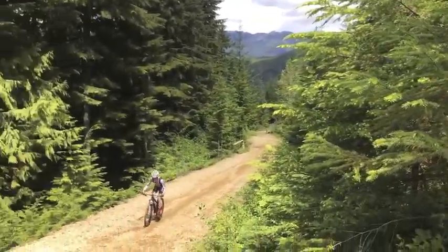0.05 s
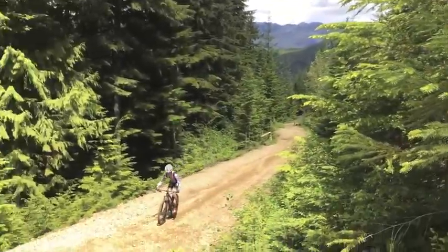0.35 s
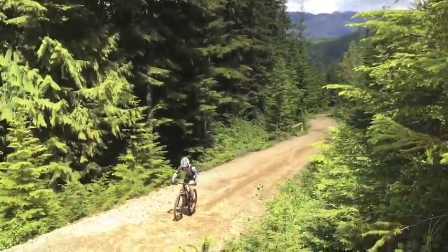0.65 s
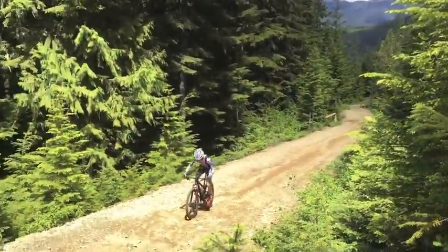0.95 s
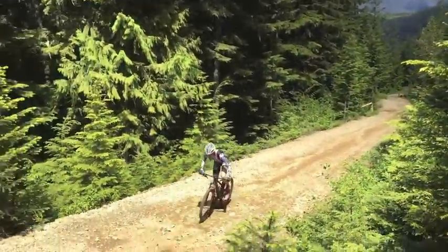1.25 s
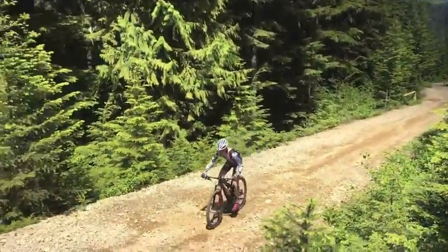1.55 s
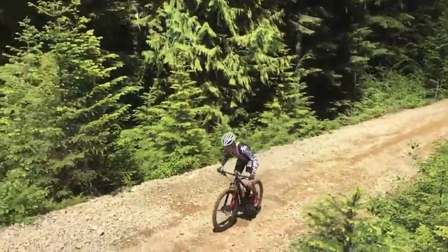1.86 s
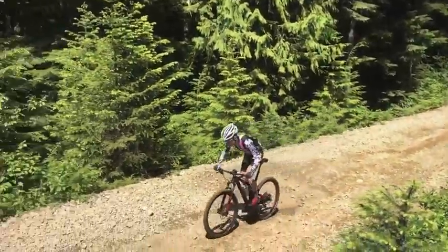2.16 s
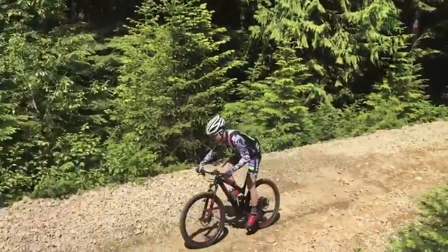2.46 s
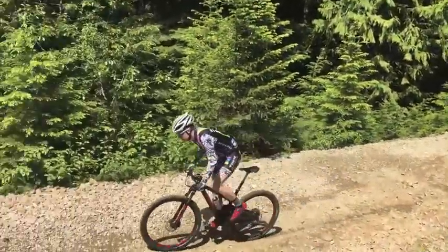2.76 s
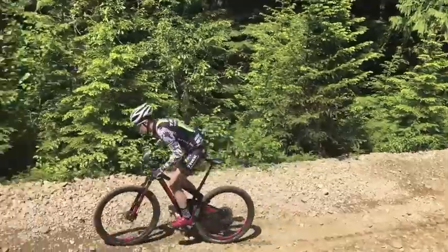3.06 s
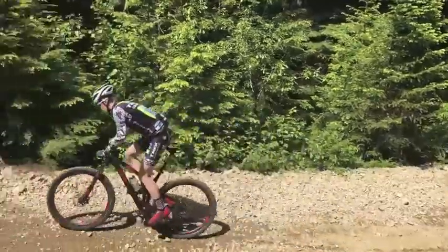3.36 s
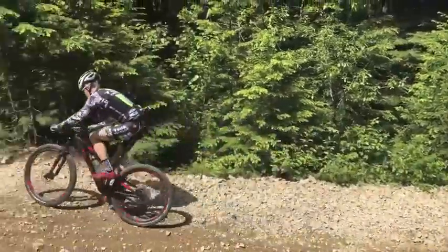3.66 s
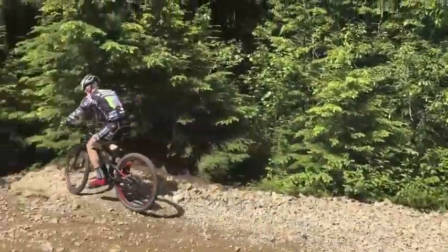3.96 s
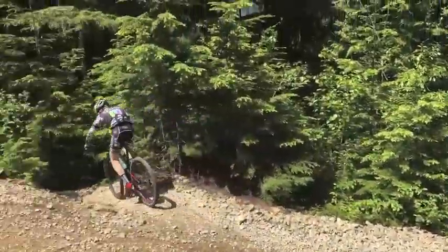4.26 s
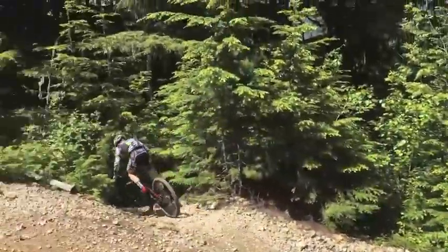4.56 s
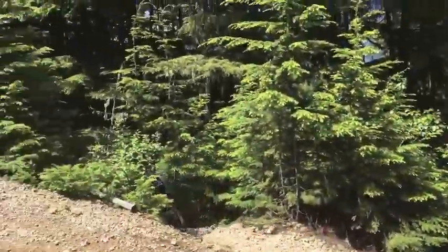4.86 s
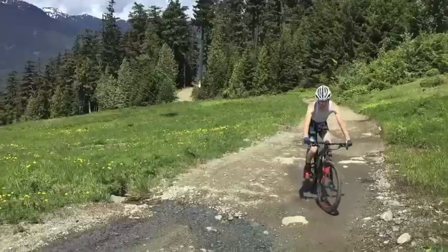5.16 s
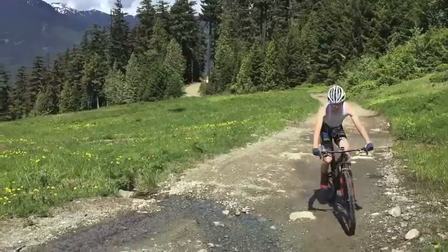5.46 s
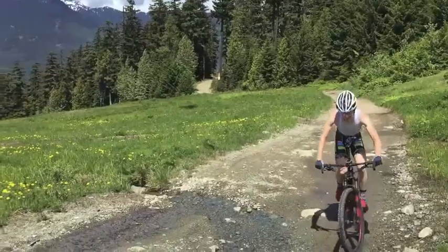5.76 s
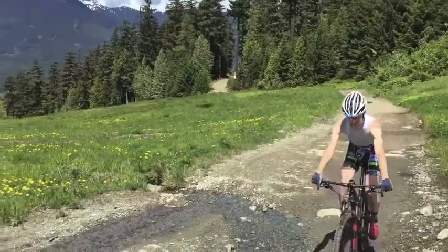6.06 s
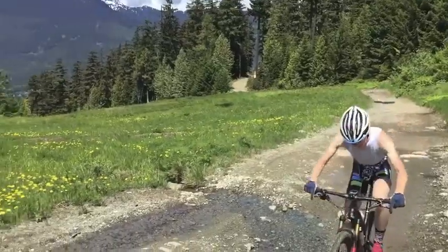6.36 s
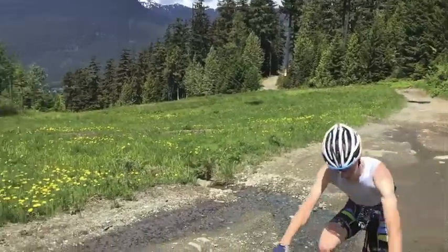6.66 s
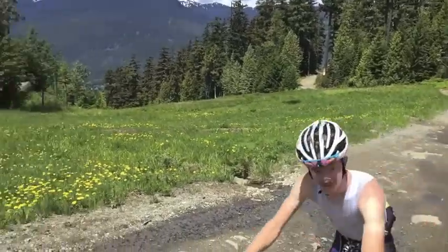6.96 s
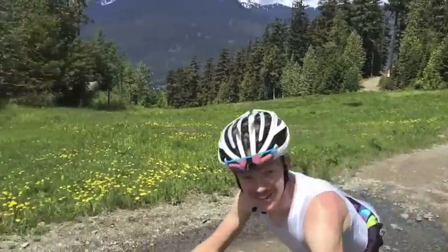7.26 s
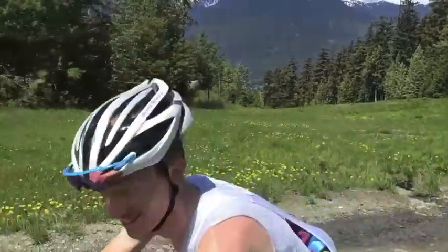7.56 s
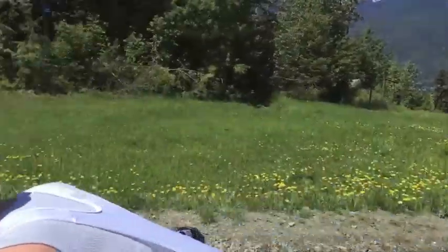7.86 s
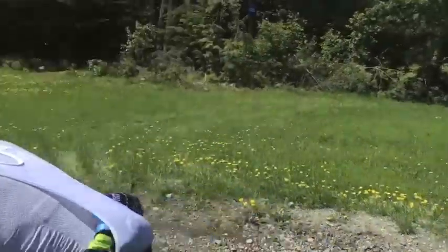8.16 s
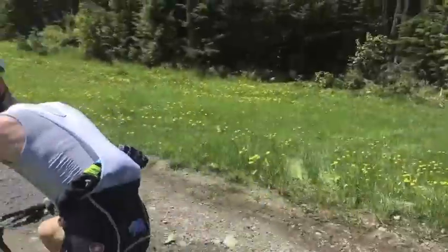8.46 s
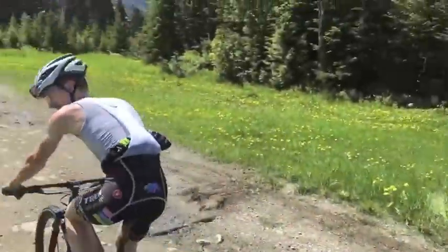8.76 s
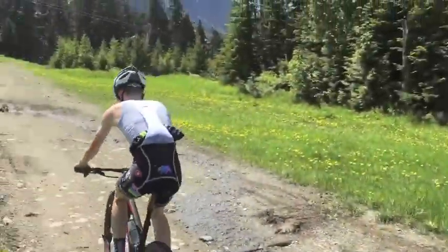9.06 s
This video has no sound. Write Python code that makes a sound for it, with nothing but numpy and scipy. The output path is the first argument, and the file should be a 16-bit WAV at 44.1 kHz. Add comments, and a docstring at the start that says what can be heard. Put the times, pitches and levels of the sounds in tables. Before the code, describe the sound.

A mountain bike approaches on a gravel forest road, its tyres crunching softly, then louder as it passes, popping stones aside and thumping into loose heaps while the chain faintly jingles. After a brief dip, a second ride passes close to the microphone with a brighter, grittier crunch and a short skid. A faint bird calls far off, and low wind buffets the microphone, hardest at the end.

```python
"""Tyres crunch on gravel: a mountain bike rolls down a forest road and past, then a second ride passes
close by on a meadow track. The tyres grind countless small stones, pop larger ones aside, thump into
loose heaps and slide briefly; the chain jingles. A small bird calls far off in the hush of the forest,
and swirls of wind buffet the microphone, hardest at the end."""
import sys
import numpy as np
from scipy import signal
from scipy.fft import rfft, irfft
from scipy.io import wavfile
from scipy.ndimage import uniform_filter1d

SR = 44100
rng = np.random.default_rng(int(sys.argv[2]) if len(sys.argv) > 2 else 0)


def wav_record(signal):
    """Record a signal, one row per channel, as 16-bit PCM in the file named by sys.argv[1]."""
    frames = np.transpose(np.atleast_2d(signal))
    bounded = np.clip(frames, -1, 1)
    # unit amplitude maps onto the largest positive 16-bit level
    quanta = np.round(bounded * 32767).astype(np.int16)
    wavfile.write(sys.argv[1], SR, quanta)


N = 406769
TIME = np.arange(N) / SR
BEND_S, BANK_S = 2.25, 3.45  # the first rider enters the bend, then climbs the bank
CHANGE_S = 5.058  # the first ride gives way to the second
PASS_S, AWAY_S = 6.551, 7.61  # the second rider reaches the loose gravel, then leaves it


def undb(db):
    """Turn decibels into a factor to multiply by."""
    return np.exp(np.asarray(db) * np.log(10) / 20)


def unit(x):
    """Scale to an average level (rms) of 1."""
    return x / np.sqrt(np.mean(x ** 2))


def peak(x):
    """Scale to a peak of 1."""
    return x / np.abs(x).max()


def burst(x, size=176):
    """Scale a short sound so that its loudest few milliseconds have rms 1."""
    return x / np.sqrt(uniform_filter1d(x ** 2, size).max())


def add(out, start_s, x):
    """Mix a short sound into a longer one."""
    i = max(int(start_s * SR), 0)
    out[i:i + len(x)] += x[:len(out) - i]


def curves(table):
    """Join rows that begin with a time into one curve for each other column."""
    times, *columns = np.transpose(table)
    return [np.interp(TIME, times, column) for column in columns]


def walk(turns_per_s):
    """Random wandering with a spread near 1."""
    points = rng.standard_normal(4096)
    return np.interp(TIME * turns_per_s, np.arange(len(points)), points)


def clicks(per_s, spread_db):
    """Clicks at random moments, many weak and a few strong."""
    out = np.zeros(N)
    place, strength, side = rng.random((int(per_s * N / SR), 3)).T
    level_db = -spread_db * np.log(strength + np.exp(-4))
    out[(place * N).astype(int)] = np.sign(side - .5) * undb(level_db)
    return out


def keep(x, side, hz, order):
    """Keep the "low" or the "high" side of a frequency, or the "band" between two."""
    return signal.sosfilt(signal.butter(order, hz, side, fs=SR, output="sos"), x)


def band(x, low_hz, high_hz, order=2):
    """Keep what lies between two frequencies; a higher order cuts more steeply."""
    return keep(x + 1e-18, "band", [low_hz, min(high_hz, .47 * SR)], order)


def ring(x, hz, q):
    """Make a sound ring at one pitch; a higher q rings longer."""
    return signal.lfilter(*signal.iirpeak(min(hz, .42 * SR), max(q, 1), fs=SR), x + 1e-18)


def colour(x, tone, size=4096):
    """Shape the bass and treble along rows of pitch_hz, level_db."""
    hz, db = np.transpose(tone)
    bins_hz = np.maximum(np.fft.rfftfreq(size, 1 / SR), 1)
    gain = undb(np.interp(np.log(bins_hz), np.log(hz), db))
    # build the filter so that it never rings ahead of a click
    cepstrum = irfft(np.log(gain))
    cepstrum[1:size // 2] *= 2
    cepstrum[size // 2 + 1:] = 0
    response = irfft(np.exp(rfft(cepstrum)))
    return signal.oaconvolve(x, response)[:len(x)]


def air(level_db=-63):
    """The forest air makes a steady hush."""
    # tone of the hush: pitch_hz, level_db
    air_tone = [(180, -24.5), (300, -7.5), (430, -16), (587, 6), (913, -5.5), (1620, -12.5), (2300, -41.5),
                (4500, -27), (9000, -28), (15000, -35)]
    return undb(level_db) * unit(colour(rng.standard_normal(N), air_tone))


def bird(gain_db=-9.5, waver=0.017, flutter_db=3, echo_db=-2, echo_s=.18):
    """A far bird sings thin, wavering whistles, smeared by the trees between."""
    # whistles: start_s, length_s, start_hz, end_hz, level_db (before gain_db)
    notes = [(0.259, .038, 5450, 5230, -63), (0.322, 0.03, 5440, 5280, -65), (5.28, 0.029, 3450, 3070, -52),
             (5.328, .055, 3150, 3050, -54.5)]
    song = np.zeros(N)
    for start_s, length_s, start_hz, end_hz, level_db in notes:
        progress = np.linspace(0, 1, int(length_s * SR))
        hz = start_hz + (end_hz - start_hz) * progress ** 2
        hz *= 1 + waver * walk(310)[:len(hz)]
        whistle = np.sin(2 * np.pi * np.cumsum(hz) / SR)
        add(song, start_s, undb(level_db) * np.sin(np.pi * progress) * whistle)
    song *= undb(flutter_db * walk(150))
    t = TIME[:SR // 2]
    scatter = rng.standard_normal(len(t)) * undb(-60 * t / echo_s)
    echo = signal.oaconvolve(song, scatter / np.linalg.norm(scatter))[:N]
    return undb(gain_db) * (song + undb(echo_db) * echo)


def wind_swirls(gain_db=6.5, lead_s=0.0012, wake_s=0.024, churn_s=0.0086):
    """Each swirl of wind is one swing of pressure at the microphone, with a churning wake."""
    # swirls: time_s, peak_db (before gain_db), pitch_hz
    swirls = [(0.186, -34.5, 187), (1.737, -41, 135), (5.2, -37.5, 139), (7.236, -39.5, 115),
              (7.746, -37, 107), (7.859, -23.5, 128), (7.896, -26, 148), (7.928, -32, 148),
              (7.966, -32, 137), (8.16, -31, 140), (8.181, -32, 168), (8.2, -32, 158), (8.282, -32, 124),
              (8.31, -38, 126), (8.413, -36.5, 124), (8.439, -40.5, 193), (8.942, -24.5, 142),
              (8.98, -29, 154), (9.022, -36, 128), (9.088, -30, 117), (9.213, -32.5, 111)]
    out, t = np.zeros(N), TIME[:8192] - TIME[1024]
    for time_s, peak_db, hz in swirls:
        spread = (np.pi * hz * t) ** 2
        swing = (1 - 2 * spread) * np.exp(-spread)
        slow, fast = rng.standard_normal((2, len(t))) * (t > 0)
        wake = burst(band(slow * np.exp(-np.abs(t) / wake_s), 27, 118, order=3))
        churn = burst(band(fast * np.exp(-np.abs(t) / churn_s), 150, 410))
        buffet = swing + undb(-13) * wake + undb(-28) * churn
        add(out, time_s + t[0] - lead_s, undb(peak_db + gain_db) * buffet)
    # the microphone's opening leaks the slowest pressure, so each swing overshoots
    return keep(out, "high", 45, order=3)


def breeze(gain_db=2.5, flutter_db=4.0, swell_db=1.5):
    """The breeze makes a low, fluttering rumble."""
    # strength of the breeze: time_s, level_db (before gain_db)
    strength = [(0, -59.5), (1.2, -58.5), (1.7, -57.5), (2.2, -60), (2.7, -57.5), (4.1, -59), (4.9, -56),
                (5.3, -62), (6.1, -57), (7.5, -55.5), (9.22, -53.5)]
    # tone of the rumble: pitch_hz, level_db
    rumble_tone = [(20, -51), (35, -14), (55, 0), (100, -2.5), (170, -4), (260, -11.5), (400, -26.5),
                   (900, -51.5)]
    gusts = rng.standard_normal(N) * undb(flutter_db * walk(22) + swell_db * walk(3.7))
    return unit(colour(gusts, rumble_tone)) * undb(curves(strength)[0] + gain_db)


def tree_echo(x, echo_db=-21, echo_s=0.096):
    """Trunks and the bank add a faint, dull echo."""
    t = TIME[:SR // 2]
    scatter = band(rng.standard_normal(len(t)), 250, 3700, order=1)
    scatter *= undb(-60 * t / echo_s) * (t > .006)
    return x + undb(echo_db) * signal.oaconvolve(x, scatter / np.linalg.norm(scatter))[:N]


def road_echo(x, delay_s=0.002182, echo_db=-11, drift_octaves=0.36):
    """The road reflects the crunch a moment late; the delay drifts as the bike moves, shifting the tone."""
    late_s = delay_s * 2 ** (drift_octaves * walk(2))
    echo = undb(echo_db) * np.interp(TIME - late_s, TIME, x)
    return (x + echo) / np.hypot(1, undb(echo_db))


def chain():
    """On rough ground the links tick against the cogs and ring the thin steel."""
    # bouts of jingling: start_s, length_s, level_db
    rattles = [(3.284, 0.075, -65), (3.763, 0.33, -74), (4.39, 0.17, -70), (4.535, 0.13, -59),
               (4.842, 0.2, -69), (8.595, 0.43, -74.5)]
    # ringing notes of the chain and cogs: pitch_hz, level_db
    steel_notes = [(5600, -1), (6150, 7), (7000, 8), (9600, 8), (9950, 4), (13000, 0)]
    ticks = clicks(per_s=330, spread_db=4)
    steel = unit(sum(undb(db) * unit(ring(ticks, hz, q=27)) for hz, db in steel_notes))
    shake = np.zeros(N)
    for start_s, length_s, level_db in rattles:
        add(shake, start_s, undb(level_db) * signal.windows.tukey(int(length_s * SR), .5))
    return steel * shake


def tread(start_s=6.565, length_s=.21, knob_hz=266, level_db=-43, wobble=0.0588, flutter_db=4):
    """The knobs of a hard-pressed tyre drum on the ground in a short growl."""
    load = np.zeros(N)
    add(load, start_s, undb(level_db) * signal.windows.tukey(int(length_s * SR), .5))
    load *= undb(flutter_db * walk(40))
    hz = knob_hz * (1 + wobble * walk(50))
    return load * np.sin(2 * np.pi * np.cumsum(hz) / SR)


def slide(width_hz=230, spray_db=-10):
    """A tyre slides sideways: its knobs scrape in a rising rasp that ends in a spray of grit."""
    # the scrape: time_s, level_db, pitch_hz
    scrape = [(7.38, -47, 1537), (7.44, -38, 1675), (7.49, -39.5, 1707), (7.55, -33.5, 2000),
              (7.59, -43, 2040), (7.62, -80, 2000)]
    level_db, hz = curves(scrape)
    slips = clicks(per_s=2100, spread_db=3.0) * np.exp(2j * np.pi * rng.random(N))
    roughness = keep(slips, "low", width_hz, order=2)
    # move the roughness up to the pitch of the scrape
    rasp = unit(np.real(roughness * np.exp(2j * np.pi * np.cumsum(hz) / SR)))
    progress = (TIME - scrape[0][0]) / (scrape[-1][0] - scrape[0][0])
    grit = clicks(per_s=3000, spread_db=2)
    spray = unit(band(grit, 4200, 9100, order=3)) * 2 * progress ** 2
    return (rasp + undb(spray_db) * spray) * undb(level_db) * (progress > 0) * (progress < 1)


def chips(rise_s=0.00033):
    """A hard chip of stone chatters against another and rings with a few short notes."""
    # clinks: start_s, peak_db, pitch_hz, contact_s
    clinks = [(0.4345, -48, 3900, .0014), (1.1305, -35.5, 2310, 0.0025), (1.193, -46, 2560, 0.0035),
              (1.492, -50.5, 7200, 0.0039), (1.988, -43, 4300, 0.0015), (3.309, -35, 6900, 0.0032),
              (5.457, -52, 3900, 0.0032), (5.78, -38, 3670, 0.0021), (5.857, -46, 3740, 0.0018),
              (5.935, -39, 3600, .0022), (6.16, -42, 4590, 0.0022), (6.903, -33, 4200, 0.0046),
              (6.962, -34.5, 6200, 0.0039), (7.056, -32.5, 5230, 0.0017), (7.3426, -25, 4080, 0.003),
              (8.642, -36, 3850, 0.0014)]
    # ringing notes of a chip: pitch_ratio, level_db
    chip_notes = [(1, 0.5), (1.65, -6), (3.7, -7.5)]
    out, t = np.zeros(N), TIME[:2048]
    for start_s, peak_db, hz, contact_s in clinks:
        contact = rng.standard_normal(len(t)) * (1 - np.exp(-t / rise_s)) * np.exp(-t / contact_s)
        clink = 0
        for ratio, level_db in chip_notes:
            note = ring(ring(contact, hz * ratio, q=6), hz * ratio, q=2)
            clink += undb(level_db) * peak(note)
        add(out, start_s, undb(peak_db) * peak(band(clink, 1400, 12000)))
    return out


def slams(spill_db=-20, spill_s=0.012):
    """A tyre crushes a heap of stones: a crunch, a hard clack, a spit of grit and a rubbery thud."""
    # hits: start_s, level_db, pitch_hz, grit_db (more gives more spit and clack), rise_s, decay_s
    hits = [(1.541, -39.5, 1460, -33, 0.00051, 0.011), (2.643, -38, 1630, -57, 0.00068, 0.0056),
            (3.073, -38.5, 1840, -33, 0.0009, 0.0062), (3.594, -34.5, 1630, -31, 0.0055, 0.015),
            (3.794, -34.5, 1340, -24.5, 0.0015, 0.0067), (4.083, -18.5, 1590, -19, 0.00087, 0.0037),
            (4.426, -38, 1180, -63, 0.0034, 0.01), (4.559, -28, 1500, -16, 0.0017, 0.0054),
            (4.733, -33.5, 1160, -74, 0.0044, 0.0066), (6.551, -23.5, 1500, -6, 0.0014, 0.0085),
            (6.583, -27, 2010, -35, 0.00069, 0.0039), (9.009, -38.5, 1040, -31, 0.0031, 0.0044),
            (9.155, -41, 1200, -27, 0.00096, 0.008)]
    out, t = np.zeros(N), TIME[:8192]
    for start_s, level_db, hz, grit_db, rise_s, decay_s in hits:
        # the heap gives way, then a few stones spill after
        spill = undb(spill_db) * np.exp(-t / spill_s)
        force = (1 - np.exp(-t / rise_s)) ** 2 * (np.exp(-t / decay_s) + spill)
        coarse, medium, fine, rubber = force * rng.standard_normal((4, len(t)))
        crunch = burst(band(ring(coarse, hz, q=1.46), 520, 1740))
        clack = undb(grit_db / 2 - 2) * burst(band(ring(medium, 2800, q=2.6), 1250, 5100))
        spit = undb(grit_db - 3) * burst(band(ring(fine, 6600, q=3.7), 3400, 16600))
        thud = undb(-14) * burst(band(rubber, 143, 740))
        add(out, start_s, undb(level_db) * burst(crunch + clack + spit + thud))
    return out


def rolling_db():
    """Plain rolling grows and fades as each rider nears and leaves."""
    # base level of each ride's crunch: time_s, level_db
    first_ride = [(0, -57), (.7, -58), (1.4, -56.5), (2.25, -57), (2.65, -51.5), (3.2, -46.5),
                  (3.98, -46.5), (4.33, -53.5), (4.8, -50.5), (5.05, -62)]
    second_ride = [(5.06, -56.5), (5.75, -53), (6.1, -44.5), (6.5, -50.5), (6.8, -40.5), (7.12, -42.5),
                   (7.23, -48), (7.45, -42), (7.65, -48), (7.88, -44.5), (8.05, -48.5), (8.8, -49),
                   (9.0, -56), (9.22, -50.5)]
    return np.where(TIME < CHANGE_S, curves(first_ride)[0], curves(second_ride)[0])


def stray_pops(per_s=2.8, above_db=8, spread_db=5, pitch_hz=1500, spread_octaves=0.22, snap_db=-18):
    """List random pops of lesser stones; they follow the rolling level, from the bend onward."""
    place, size, pitch = rng.random((int(per_s * N / SR), 3)).T
    at = (place * N).astype(int)
    peaks_db = rolling_db()[at] + above_db + spread_db * (2 * size - 1)
    pitches_hz = pitch_hz * 2 ** (spread_octaves * (2 * pitch - 1))
    return [(s, db, hz, snap_db) for s, db, hz in zip(TIME[at], peaks_db, pitches_hz) if s > BEND_S]


def popping_stones(snap_s=0.0025, skitter_db=-20, skitter_s=0.012):
    """A stone pops out against a neighbour and skitters: two dull knocks, a snap and a thud of the tyre."""
    # stones squeezed from under a tyre: start_s, peak_db, pitch_hz, snap_db (more is sharper)
    pops = [(1.642, -33, 1500, -13), (2.064, -34, 1730, -16), (2.711, -26.5, 2160, -26),
            (2.761, -32, 1260, -34), (2.838, -22.5, 1490, -37), (2.959, -36, 1440, -10),
            (3.117, -11, 1560, -34), (3.124, -18, 1500, -34), (3.162, -23, 1460, -21),
            (3.204, -24, 1550, -19), (3.25, -27, 1150, -17.5), (3.412, -37, 1840, -23),
            (3.425, -30, 1800, -24), (3.462, -29.5, 1500, -30), (3.616, -24, 1320, -28),
            (3.873, -28, 1290, -17), (3.925, -31, 1490, -22), (4.118, -33, 1080, -17),
            (4.162, -36, 1500, -16), (4.641, -28.5, 1660, -32), (5.672, -35, 1780, -19),
            (6.171, -32, 2050, -14), (6.856, -24, 1570, -20), (6.886, -22, 1650, -26),
            (7.014, -29, 1700, -7), (7.086, -24.5, 1620, -24), (7.198, -32, 1710, -4),
            (7.318, -20.5, 1700, -14), (7.484, -15.5, 1630, -32), (7.5, -16, 1730, -26),
            (7.672, -21.5, 1980, -25), (7.715, -29, 1810, -27), (7.78, -24, 1770, -19),
            (7.939, -23.5, 1800, -15), (7.968, -22, 1920, -28), (8.157, -32, 1540, -13),
            (8.355, -29, 1900, -15), (8.458, -27.5, 1660, -14)]
    out, t = np.zeros(N), TIME[:4096]
    for start_s, peak_db, hz, snap_db in list(pops) + stray_pops():
        skitter = rng.standard_normal(len(t)) * np.exp(-t / skitter_s) / np.sqrt(SR / 1000)
        push = 1. * (t == 0) + undb(skitter_db) * skitter
        ring_scatter, octaves_apart = rng.uniform(-1, 1, 2)
        q = 2.4 * np.exp(.3 * ring_scatter)  # stones hardly ring
        stone = peak(ring(ring(push, hz, q), hz, q))
        neighbour = undb(-7) * peak(ring(push, hz * 2 ** octaves_apart, q))
        knock = peak(band(stone + neighbour, 500, 1.6 * hz, order=5))
        crack = rng.standard_normal(len(t)) * np.exp(-t / snap_s)
        snap = undb(snap_db - 1) * peak(band(crack, 2200, 6900))
        thud = undb(-11) * peak(band(push, 83, 540))
        add(out, start_s, undb(peak_db) * peak(knock + snap + thud))
    return out


def pebbles(per_s=300, spread_db=3.5, low_hz=900, high_hz=7500, ring_s=0.0021, crack_s=0.00091):
    """Middling stones crack one by one, each with three short notes of its own."""
    out, t = np.zeros(N), TIME[:768]
    for place, size, *pitches in rng.random((int(per_s * N / SR), 5)):
        notes_hz = [low_hz * (high_hz / low_hz) ** pitch for pitch in pitches]
        notes = sum(np.sin(2 * np.pi * hz * t) for hz in notes_hz) * np.exp(-t / ring_s)
        crack = rng.standard_normal(len(t)) * np.exp(-t / crack_s)
        level_db = -spread_db * np.log(size + np.exp(-3))
        add(out, place * N / SR, undb(level_db) * (unit(notes) + undb(-3) * unit(crack)))
    return unit(out)


def gravel(patchy_db=4.0, drift_db=2.5, clump_db=2.8):
    """Stones of many sizes knock together and ring briefly, among cracking pebbles and a wash of sand."""
    stones = 0
    for hz in np.geomspace(200, 15500, 30):
        # small stones are more numerous and ring higher; each size comes and goes in patches
        contacts = clicks(per_s=400 * (hz / 1000) ** .7, spread_db=3.2)
        contacts *= undb(patchy_db * walk(60) + drift_db * walk(11))
        stones += np.sqrt(hz) * unit(ring(contacts, hz, q=9))
    cracks = undb(-14) * unit(clicks(per_s=380, spread_db=3.5))
    grains = unit(stones) + undb(-6.5) * pebbles() + cracks
    sand = undb(-13) * rng.standard_normal(N)
    # the tread bites into the ground in uneven clumps
    return unit((grains + sand) * undb(clump_db * np.tanh(walk(34))))


def loose_patches(bite_s=0.011, sag_db=3, release_s=0.029):
    """Extra crunch and grit power as a tyre bites into loose gravel, packs it down and rolls clear."""
    # patches of loose gravel: start_s, length_s, crunch_db, grit_db
    patches = [(0.118, 0.2, -51.5, -77), (0.46, 0.18, -54, -78), (0.857, 0.018, -47.5, -65.5),
               (1.201, 0.14, -53.5, -74), (1.475, 0.03, -48.5, -64), (1.53, 0.26, -46.5, -68.5),
               (1.932, 0.21, -48.5, -64.5), (2.256, 0.038, -49, -73), (2.378, 0.15, -48, -67.5),
               (2.721, 0.26, -43.5, -62.5), (3.092, 0.023, -34, -51), (3.162, 0.2, -41, -59),
               (3.578, 0.082, -38.5, -55), (3.673, 0.05, -38.5, -61), (4.072, 0.063, -42, -55.5),
               (4.546, 0.081, -40, -58.5), (4.86, 0.098, -46.5, -69), (5.431, 0.22, -58, -62),
               (6.021, 0.26, -46.5, -56.5), (6.554, 0.27, -37.5, -43), (6.884, 0.066, -34, -43.5),
               (7.016, 0.17, -39.5, -45.5), (7.31, 0.052, -35.5, -40.5), (7.402, 0.18, -39.5, -54),
               (7.823, 0.1, -48, -53), (8.261, 0.089, -47, -51), (8.619, 0.25, -48.5, -53)]
    crunch_power, grit_power = np.zeros((2, N))
    for start_s, length_s, crunch_db, grit_db in patches:
        t = TIME[:int((length_s + 6 * release_s) * SR)]
        bite = np.minimum(t / bite_s, 1) * undb(-sag_db * np.minimum(t / length_s, 1))
        force = bite * np.exp(-np.maximum(t - length_s, 0) / release_s)
        add(crunch_power, start_s, (force * undb(crunch_db)) ** 2)
        add(grit_power, start_s, (force * undb(grit_db)) ** 2)
    return crunch_power, grit_power


def tyres():
    """Under rolling tyres coarse stones crunch low and fine grit hisses high; both swell in loose patches."""
    # tone of the ground on each stretch: pitch_hz, level_db
    descent_tone = [(110, -38), (190, 4.5), (290, -6.5), (430, -7.5), (600, 2), (740, 0), (900, -13),
                    (1080, -1.5), (1300, -7.5), (1750, -6), (2400, -15.5), (4000, -24), (5200, -41),
                    (7500, -38), (15000, -56)]
    bend_tone = [(100, -26), (160, -1.5), (430, -4), (780, 2), (1100, -4), (1650, 1.5), (2400, -8.5),
                 (3100, -11.5), (4200, -21), (5100, -36), (9500, -32.5), (12000, -45)]
    bank_tone = [(100, -22.5), (200, 0), (290, -1), (430, -9), (700, 2.5), (1100, -4), (1800, -1.5),
                 (2700, -11), (3300, -19.5), (4400, -24), (5200, -26), (9800, -30.5), (12000, -47)]
    approach_tone = [(150, -51), (250, -1.5), (390, -15.5), (680, -4.5), (984, 0), (1270, -14.5), (1390, 0),
                     (2400, -2), (2660, -10.5), (3750, -5.5), (5460, -16.5), (15000, -34)]
    pass_tone = [(110, -33), (180, -5), (265, -4), (517, -9), (780, -3.5), (920, -2), (1230, -6), (1750, 0),
                 (2890, -11.5), (3810, -12.5), (4850, -21.5), (6900, -21), (10000, -32.5), (11800, -40)]
    away_tone = [(190, -37), (330, -3), (500, -9), (630, 0.5), (1050, 0.5), (1280, 0), (2010, 0.5),
                 (2550, -2.5), (3100, -18.5), (3800, -16.5), (4900, -27.5), (6970, -27), (15000, -49.5)]
    grains = gravel()
    blurred = unit(grains + undb(-12.5) * rng.standard_normal(N))  # from afar the grains run together
    # texture, start_s, end_s, tone, crunch_db, grit_db (both added to the rolling level)
    stretches = [(blurred, 0, BEND_S, descent_tone, -1, -21.5),
                 (grains, BEND_S, BANK_S, bend_tone, 0, -19),
                 (grains, BANK_S, CHANGE_S, bank_tone, -1, -21),
                 (grains, CHANGE_S, PASS_S, approach_tone, -2.5, -12),
                 (grains, PASS_S, AWAY_S, pass_tone, 0.5, -8.5),
                 (grains, AWAY_S, N / SR, away_tone, -0.5, -12)]
    loose_crunch, loose_grit = loose_patches()
    out, roll_db = np.zeros(N), rolling_db()
    for texture, start_s, end_s, tone, crunch_db, grit_db in stretches:
        ground = colour(texture, tone)
        coarse = keep(ground, "low", 3200, order=5) / np.std(band(ground, 555, 3900))
        fine = unit(band(ground, 3470, .47 * SR, order=5))
        crunch = coarse * np.sqrt(undb(roll_db + crunch_db) ** 2 + loose_crunch)
        grit = fine * np.sqrt(undb(roll_db + grit_db) ** 2 + loose_grit)
        on_stretch = uniform_filter1d(1. * ((TIME >= start_s) & (TIME <= end_s)), size=200)
        out += on_stretch * (crunch + grit)
    return out


def scene(fade_out_s=0.062, fade_in_s=0.1):
    """Mix the bikes, bird, air and wind; all of it dips briefly between the two rides."""
    bikes = road_echo(tyres()) + popping_stones() + chips() + slams() + slide() + chain() + tread()
    mix = tree_echo(bikes + bird()) + air() + wind_swirls() + breeze()
    dip = np.maximum((CHANGE_S - TIME) / fade_out_s, (TIME - CHANGE_S) / fade_in_s)
    return (mix * np.minimum(dip, 1))[None]


def record(dry, top_hz=15950):
    """Cut off the very highest treble."""
    return signal.sosfilt(signal.ellip(10, .2, 70, top_hz, fs=SR, output="sos"), dry)


dry = scene()
out = record(dry)
wav_record(out)
```